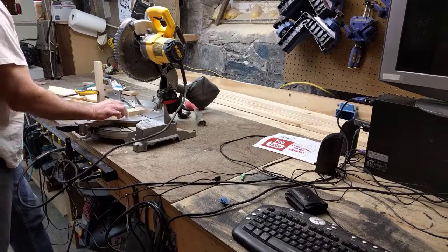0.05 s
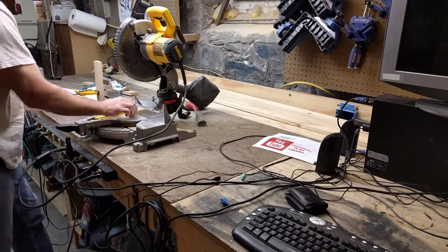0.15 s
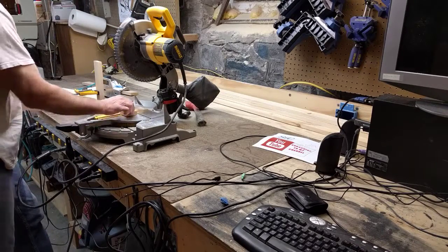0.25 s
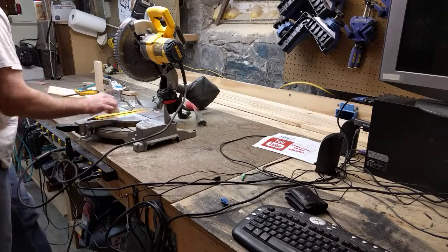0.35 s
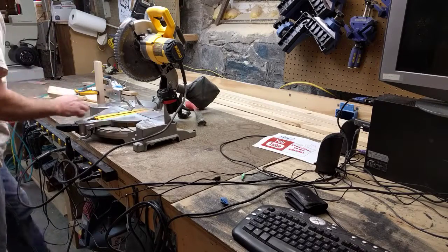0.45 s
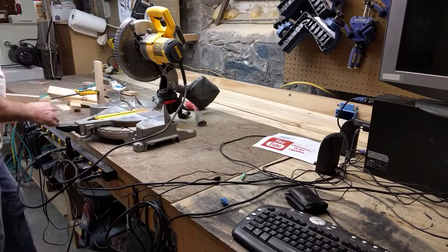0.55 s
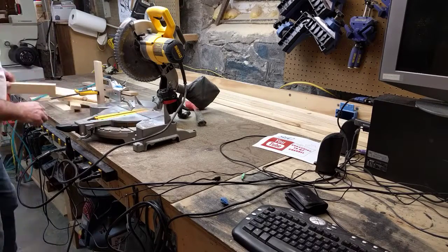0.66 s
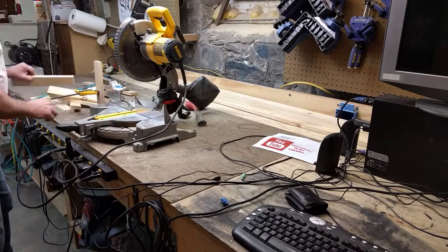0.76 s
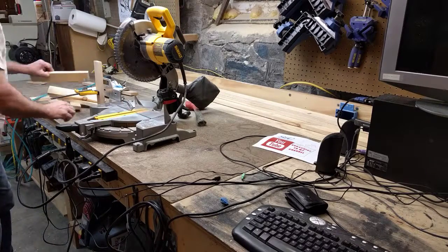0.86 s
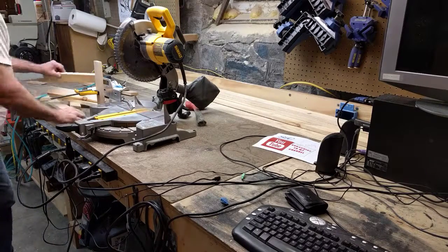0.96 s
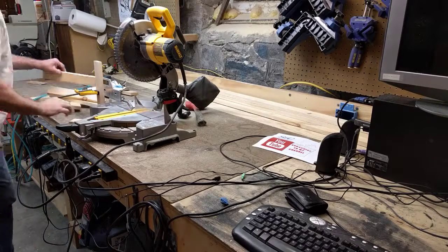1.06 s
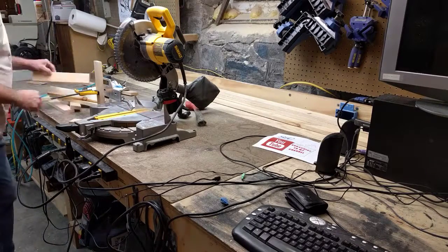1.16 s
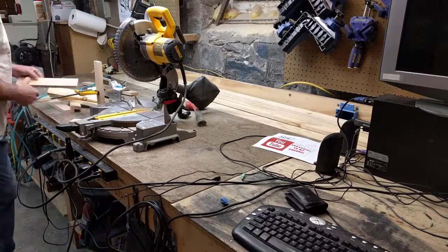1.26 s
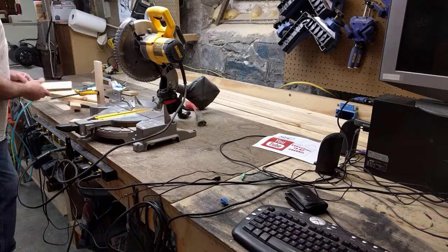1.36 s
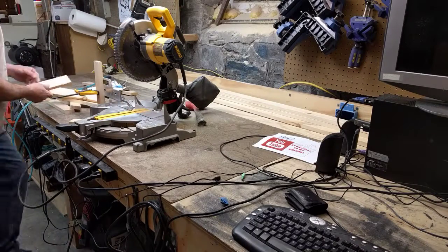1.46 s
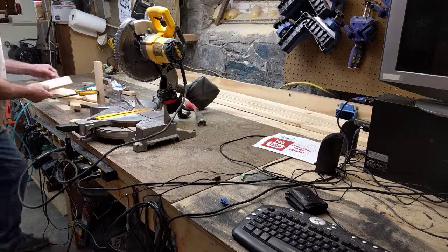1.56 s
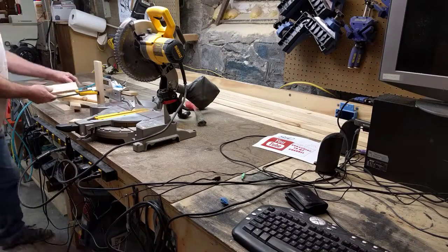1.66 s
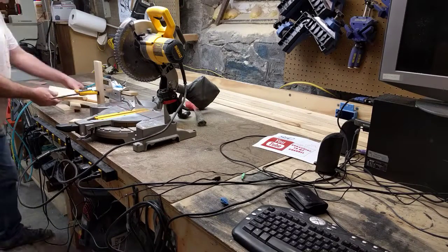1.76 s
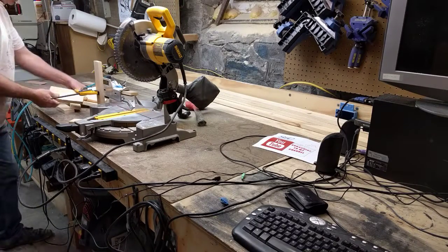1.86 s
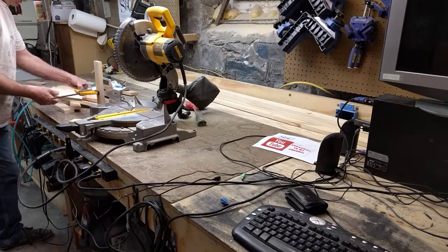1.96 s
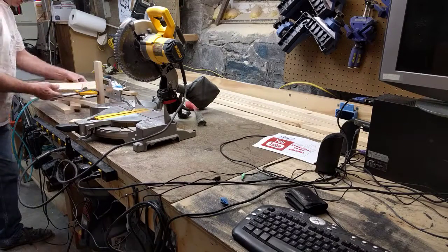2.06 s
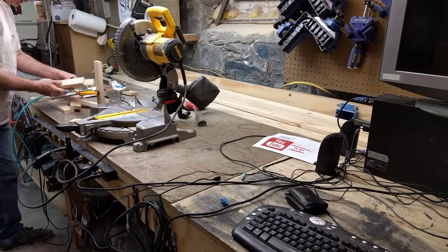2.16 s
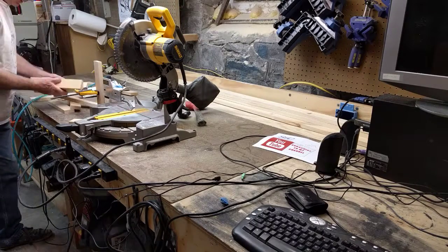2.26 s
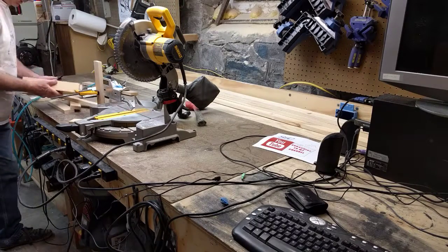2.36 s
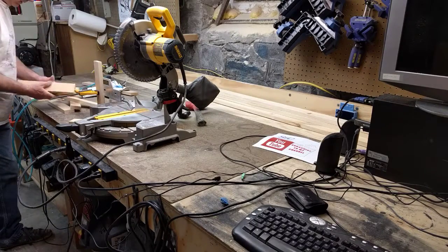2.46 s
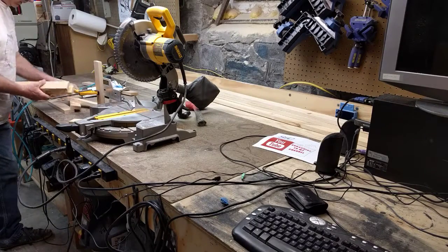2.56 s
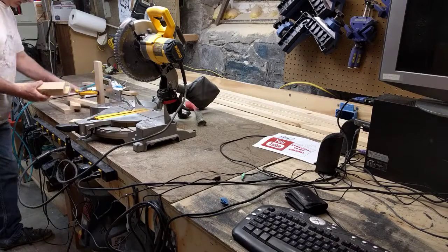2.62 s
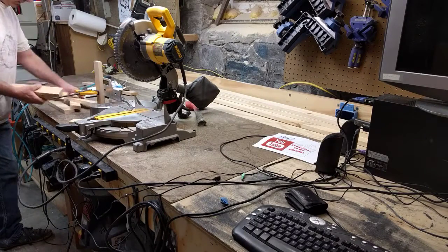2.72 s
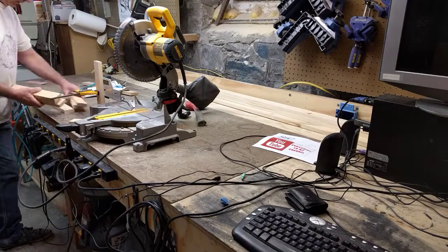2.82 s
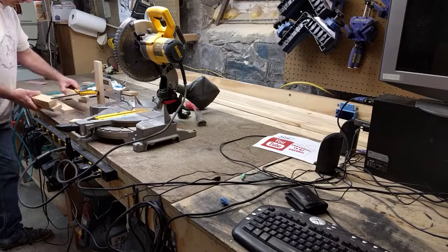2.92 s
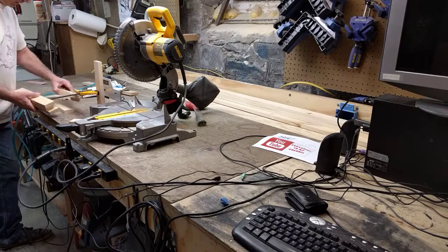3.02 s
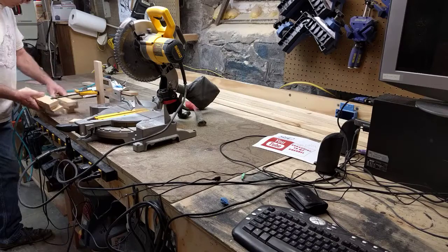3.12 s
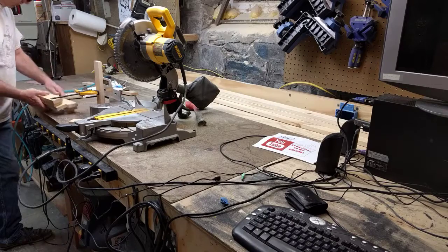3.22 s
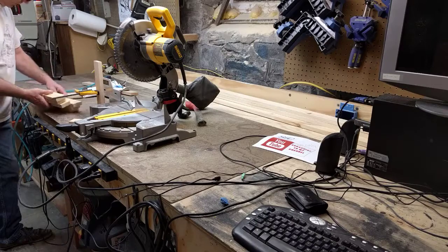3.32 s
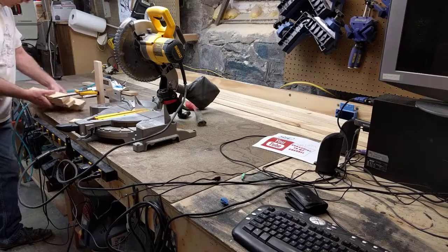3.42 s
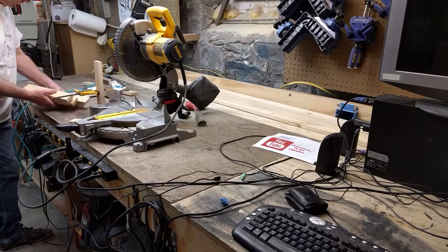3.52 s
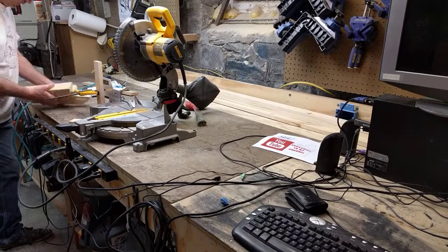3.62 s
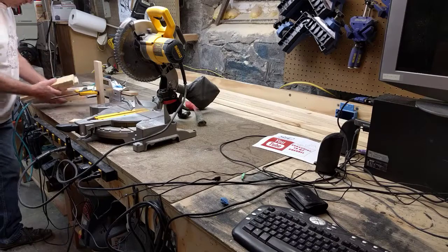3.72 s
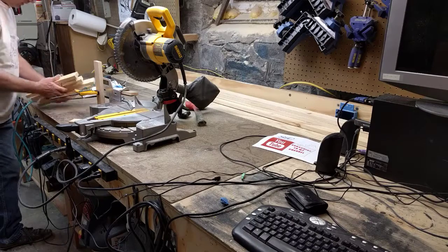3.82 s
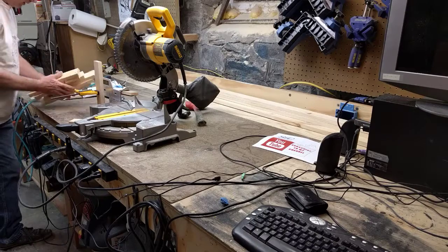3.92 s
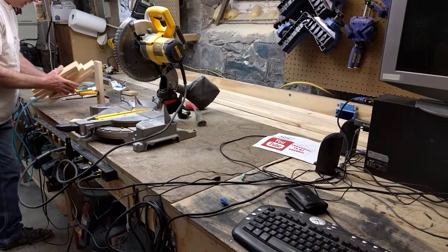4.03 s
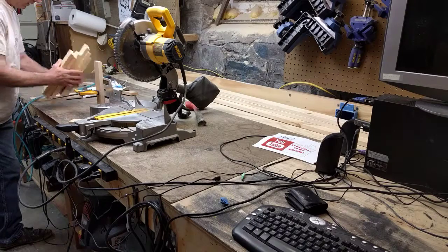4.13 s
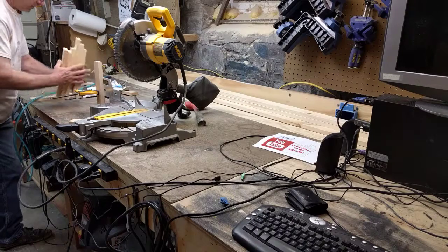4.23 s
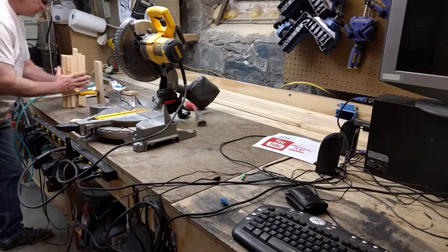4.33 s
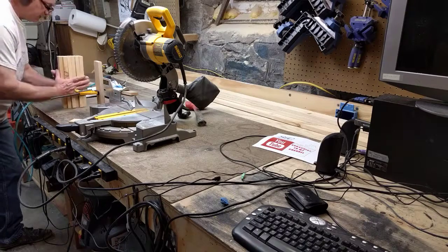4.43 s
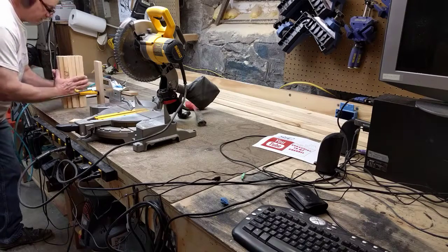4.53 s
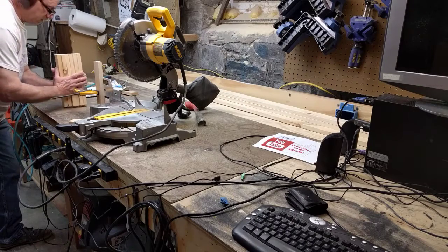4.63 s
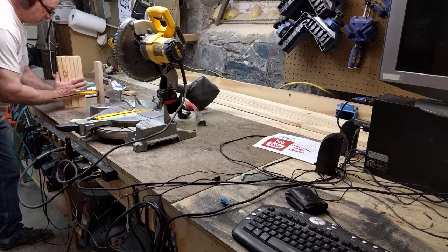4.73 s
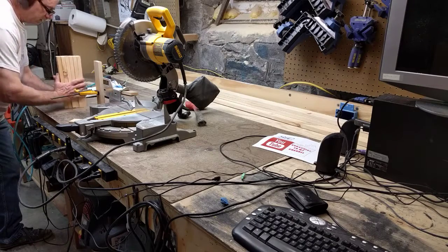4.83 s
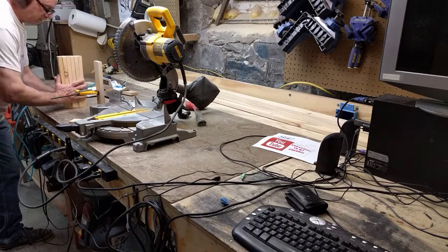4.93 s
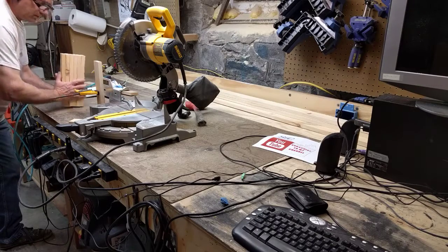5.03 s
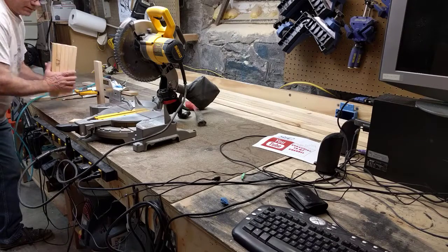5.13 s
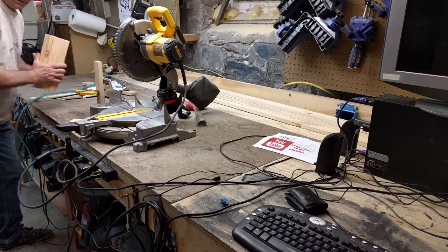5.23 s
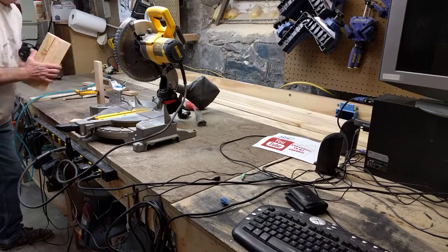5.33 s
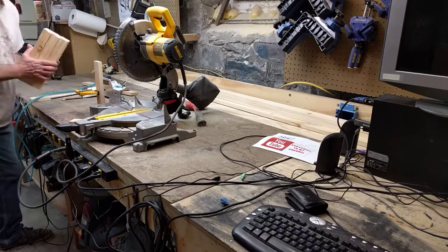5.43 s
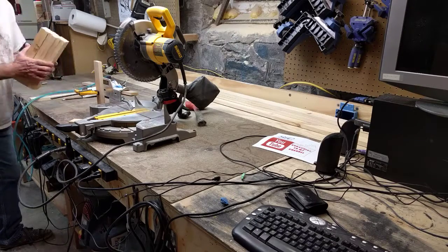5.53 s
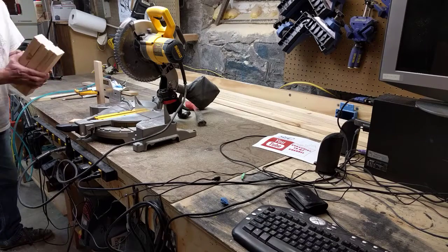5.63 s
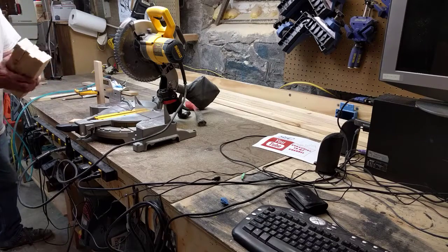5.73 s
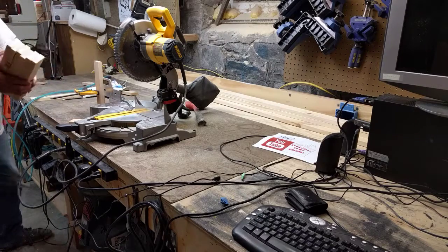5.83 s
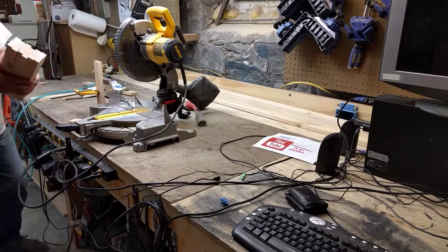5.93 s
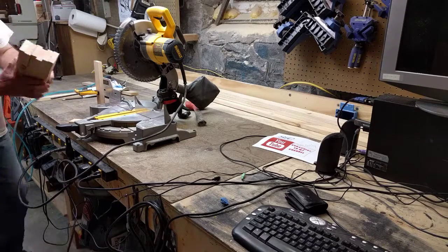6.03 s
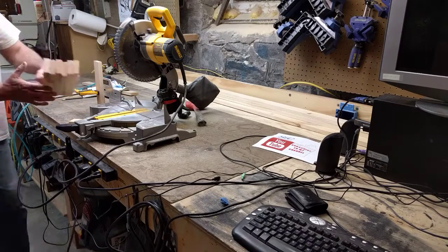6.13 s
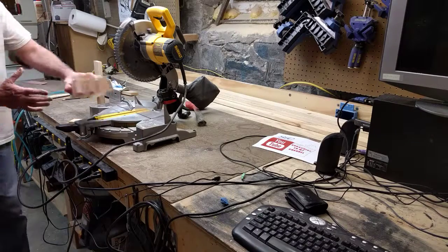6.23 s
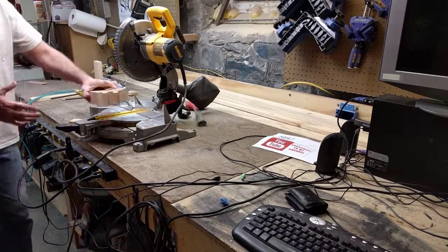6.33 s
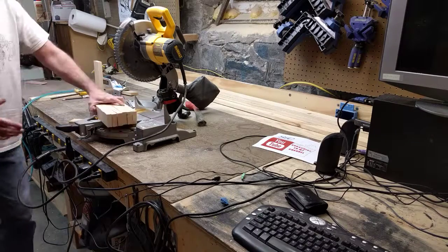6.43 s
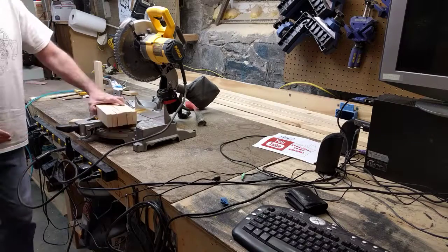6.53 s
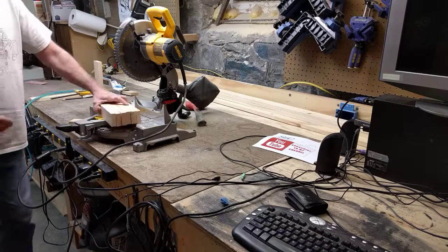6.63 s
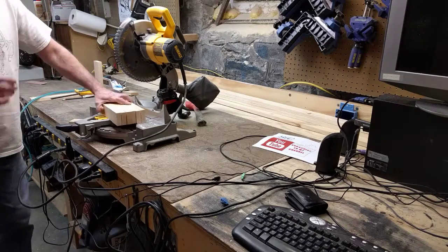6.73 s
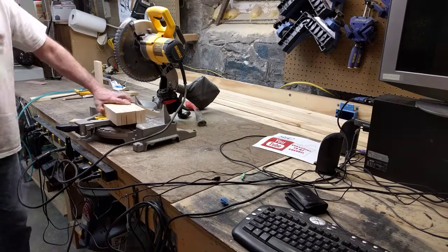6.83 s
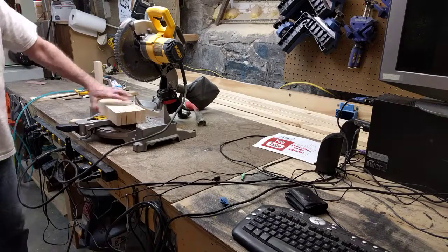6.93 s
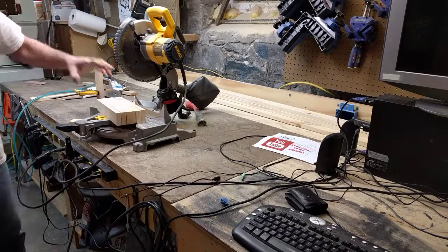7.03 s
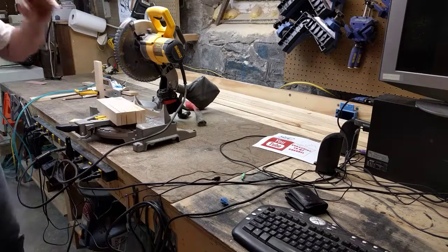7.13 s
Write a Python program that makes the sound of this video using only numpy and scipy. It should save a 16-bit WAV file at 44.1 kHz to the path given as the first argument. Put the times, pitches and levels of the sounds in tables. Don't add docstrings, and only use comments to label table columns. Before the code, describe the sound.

Hands gather wooden blocks with light clacks and rubbing hisses, knock them dully on a workbench, then bang the stack down on cast metal.

```python
import sys
import numpy as np
from scipy import signal
from scipy.fft import rfft, irfft
from scipy.io import wavfile
from scipy.ndimage import uniform_filter1d

SR = 44100
rng = np.random.default_rng(int(sys.argv[2]) if len(sys.argv) > 2 else 0)


def bounce(signal):
    frames = np.transpose(np.atleast_2d(signal))
    limited = np.clip(frames, -1, 1)
    pcm = np.round(limited * 32767).astype(np.int16)
    wavfile.write(sys.argv[1], SR, pcm)


def level_to_linear(level):
    exponent = np.asarray(level, float) / 20
    return 10 ** exponent


N = 316329

# pitch_hz, width_hz, level_db (over the broad colour)
LOOSE_MODES = [(779, 34, 4.3), (1210, 590, 0.51), (1740, 240, 5.4), (2500, 120, 5.2), (4500, 1400, 2.6)]


def rms_one(x):
    return x / np.sqrt(np.mean(x ** 2) + 1e-30)


def at_hz(points, hz):
    table_hz, values = np.array(points).T
    return np.interp(np.log(hz), np.log(table_hz), values)


def band(x, low_hz, high_hz):
    return signal.sosfilt(signal.butter(2, [low_hz, high_hz], "band", fs=SR, output="sos"), x)


def resonate(x, hz, width_hz):
    r, w = np.exp(-np.pi * width_hz / SR), 2 * np.pi * hz / SR
    return signal.lfilter([0, np.sin(w)], [1, -2 * r * np.cos(w), r * r], x + 1e-18)


def coloured(x, spectrum):
    low, high = spectrum[0][0], min(spectrum[-1][0], 17000)
    edges = np.geomspace(low, high, int(3 * np.log2(high / low)))
    out = 0
    for k, (a, b) in enumerate(zip(edges, edges[1:])):
        sign = (-1) ** k
        out = out + sign * level_to_linear(at_hz(spectrum, np.sqrt(a * b))) * band(x, a, b)
    return out


def grains(size, per_s, spread_db):
    strength = level_to_linear(spread_db * np.minimum(rng.exponential(1, size), 5))
    strength *= rng.choice([-1, 1], size)
    return strength * (rng.random(size) < per_s / SR)


def body_response(modes, colour, size):
    whole = coloured(signal.unit_impulse(size), colour)
    for hz, width_hz, db in modes:
        r, w = np.exp(-np.pi * width_hz / SR), 2 * np.pi * hz / SR
        peak = (1 - r * r) / 2 * np.array([1, 0, -1])
        mode = signal.lfilter(peak, [1, -2 * r * np.cos(w), r * r], whole)
        whole = whole + (level_to_linear(db) - 1) * mode
    ranges_hz = (600, 1400), (120, 600), (1400, 3200), (3200, 16500)
    return [band(whole, low, high) for low, high in ranges_hz]


def rebounds(x, lags, share):
    for lag in np.maximum(lags.astype(int), 1):
        loop = np.zeros(lag + 1)
        loop[0], loop[-1] = 1, -share
        x = signal.lfilter(loop[::-1], loop, x)
    return x


def knocks(events, modes, colour, chatter_ms, clack_db):
    out, size = np.zeros((2, N)), 5000
    near_modes = [(hz, width_hz, 1.096 * db) for hz, width_hz, db in modes]
    far_modes = [(hz, width_hz, 0.78 * db) for hz, width_hz, db in modes]
    near = np.array(body_response(near_modes, colour, size))
    far = np.array(body_response(far_modes, colour, size))
    for s, db, heft_db, hard_db in events:
        levels_db = np.array([db, db + heft_db, db + hard_db + clack_db, db + 2 * hard_db])
        gains = level_to_linear(levels_db - 2.5) / np.abs(near).max(axis=1) * [-1, 1, 1, -1]
        thud = np.array([gains[1] * near[1], gains[1] * far[1]])
        first = np.array([gains @ near, gains @ far]) - thud
        spacing = rng.uniform([.05, .15, .35, .3, .6], [.12, .3, .7, .55, 1.1]) * SR / 1000
        touch = rebounds(first, spacing[:3] * chatter_ms * .6, 0.71)
        scattered = rebounds(touch, spacing[3:] * 5, -0.58)
        blow = 1.344 * (0.5 * first + 0.42 * touch + level_to_linear(1) * scattered + 1.24 * thud)
        at = round(s * SR)
        out[:, at:at + size] += blow[:, :N - at]
    return out


def clean_rings(modes):
    out = np.zeros(N)
    for s, hz, db, t60 in modes:
        at = round(s * SR)
        t = np.arange(min(N - at, round(2 * t60 * SR))) / SR
        out[at:at + len(t)] += level_to_linear(db - 60 * t / t60) * np.sin(2 * np.pi * hz * t)
    return out


def workshop(x, spread):
    # pitch_hz, t60_s
    room_t60 = [(60, 0.54), (250, 0.55), (700, 0.34), (2000, 0.32), (6000, 0.25), (10000, 0.09),
                (16000, 0.055)]
    t = np.arange(SR) / SR
    white = rng.standard_normal((2, SR))
    edges = 40 * 2 ** np.arange(0, 9, .5)
    tail = np.zeros(SR)
    for k, (a, b) in enumerate(zip(edges, edges[1:])):
        tail += band(white[k % 2], a, b) * level_to_linear(-60 * t / at_hz(room_t60, np.sqrt(a * b)))
    lines = rfft(tail * (1 - np.exp(-t / 0.0013)))
    even = irfft(lines / np.sqrt(uniform_filter1d(np.abs(lines) ** 2, size=60)))
    even *= (1 - np.exp(-t / .002)) * (t < .8)
    return x + signal.fftconvolve(spread, level_to_linear(-3) * even / np.linalg.norm(even))[:N]


def fans():
    # pitch_hz, level_db (per Hz)
    air_spectrum = [(25, -31), (40, -0.5), (60, 5), (100, -5), (160, -12), (260, -13.5), (420, -6),
                    (630, -14), (900, -20.5), (1300, -18), (3200, -29), (6400, -24.5), (8300, -31.5),
                    (16500, -32.5)]
    # pitch_hz, width_hz, level_db
    fan_tones = [(113.7, 8.6, -70), (250.6, 8.7, -67), (364, 2.9, -71.5), (421, 8.2, -70), (445, 9.9, -87),
                 (847, 83, -72.5), (926, 21, -84.5)]
    white = rng.standard_normal((2, N + SR))
    air = level_to_linear(-61) * rms_one(coloured(white[0], air_spectrum))
    tones = sum(level_to_linear(db) * rms_one(resonate(white[1], hz, width_hz)) for hz, width_hz, db in fan_tones)
    return (air + tones)[SR:]


def blade():
    # start_s, pitch_hz, level_db, t60_s
    blade_modes = [
        (0, 1809, -71, 5),
        (0, 2008, -70.5, 5),
        (0, 2638, -74, 5),
        (6.49, 1852, -59, 3),
        (6.49, 2143, -63, 3),
        (6.49, 2918, -67, 3),
    ]
    return clean_rings(blade_modes)


def casting():
    # start_s, pitch_hz, level_db, t60_s
    casting_modes = [
        (6.49, 880, -38, 0.7),
        (6.49, 1270, -31, 0.53),
        (6.49, 1700, -39, 0.4),
        (6.49, 2300, -35, 0.47),
        (6.69, 355, -35, 0.33),
        (6.49, 3275, -34.5, .6),
        (6.49, 1166, -30, .3),
        (6.49, 2497, -34.5, .3),
        (6.485, 206, -27.5, .2),
    ]
    return clean_rings(casting_modes)


def thumps():
    # start_s, level_db (peak), pitch_hz
    shakes = [(0.586, -45, 64), (0.69, -54, 60), (1.935, -45, 84), (1.996, -39.5, 92), (2.772, -46, 71.2),
              (2.858, -74, 55.6), (3.176, -41.5, 88.7), (4.396, -32, 79.3), (4.449, -29, 59.2),
              (4.519, -37.5, 54.7), (4.649, -44, 58), (4.776, -35, 76.3), (4.826, -35.5, 59.8),
              (6.49, -24.5, 62.8), (6.556, -32, 57.4), (6.69, -35.5, 54.6), (6.74, -41, 67.4),
              (6.96, -52, 70), (7.06, -53, 62)]
    out, t = np.zeros(N), np.arange(SR // 2) / SR
    swell = (1 - np.exp(-t / 0.015)) * np.exp(-t / 0.053)
    for s, db, hz in shakes:
        lowest = np.sin(2 * np.pi * hz * t)
        upper = np.sin(2 * np.pi * 1.7 * hz * t) + np.sin(2 * np.pi * 2.45 * hz * t)
        at = round(s * SR)
        out[at:at + len(t)] += (level_to_linear(db) * swell * (lowest + 0.42 * upper))[:N - at]
    return out


def table_slam():
    # start_s, level_db, heft_db, hardness_db
    table_events = [
        (6.478, -13, -4.5, -2.5),
        (6.4857, -2.5, -8, 2),
        (6.4925, -7.5, -11, 5.5),
        (6.502, -19.5, -1, 0),
        (6.525, -29, -15, 2),
    ]
    # pitch_hz, width_hz, level_db
    table_modes = [(354, 50, 1.7), (574, 69, 2.7), (830, 73, 7.5), (1210, 130, 5.9), (1680, 350, 10.2),
                   (2273, 140, 7.3), (2514, 50, 7.2), (3770, 150, 2.3), (4640, 150, 7.3), (6360, 390, 6.6),
                   (7140, 150, 3)]
    # pitch_hz, level_db (per Hz)
    table_colour = [(100, -14.5), (300, -5.5), (600, -7), (1200, -0.5), (2000, -3), (3000, -7.5),
                    (4700, -5.5), (6500, -4.5), (8300, -13), (11000, -19), (16000, -26.5)]
    return knocks(table_events, table_modes, table_colour, chatter_ms=3.0, clack_db=-10.5)


def bench_knocks():
    # start_s, level_db, heft_db, hardness_db
    bench_events = [(0.57, -84, 23, 15), (0.586, -78.5, 29, 6), (0.608, -75, 10, 5),
                    (4.3605, -14.5, -10.5, -7.5), (4.366, -15.5, -7, -5), (4.380, -17, 2.5, -6),
                    (4.387, -23, -3, -3), (4.394, -22, 5.5, -3), (4.416, -16, -5, -3), (4.423, -18, 2, -4),
                    (4.4445, -10, -8, -3.5), (4.452, -20.5, -2, -10), (4.465, -29.5, 9, -12),
                    (4.485, -28, 8, -7), (4.505, -27.5, 1.5, -6), (6.195, -46.5, 1.5, -3),
                    (6.691, -50, 0, -1.5), (6.706, -40.5, 7, -2), (6.722, -42, 6, -6), (6.741, -42, 3, -2),
                    (6.756, -40.5, 4.5, -2), (6.772, -41.5, 4, -12), (6.787, -57, -4, -8),
                    (6.832, -41, -20, 1), (6.948, -53.5, 5, 0), (7.022, -50.5, -4.5, 1.5)]
    # start_s, level_db, heft_db, hardness_db
    stand_events = [
        (4.7495, -19.5, -3.5, -5.5),
        (4.757, -16, -2.5, -6),
        (4.764, -14, 1.5, -21.5),
        (4.785, -25, 3, -7),
        (4.803, -28.5, 6.5, -15),
        (4.88, -35.5, 3.5, -3.5),
    ]
    # pitch_hz, width_hz, level_db
    bench_modes = [(204, 6.2, 8.2), (353, 90, 7.1), (452.7, 37, 11.7), (605, 40, 7.1), (747, 110, 6.2),
                   (880, 69, 1), (1010, 89, 1.5)]
    # pitch_hz, width_hz, level_db
    stand_modes = [(310, 46, 2.7), (467, 35, 10.8), (608, 44, 9.9), (790, 37, 14.5), (2230, 190, 4.8)]
    # pitch_hz, level_db (per Hz)
    bench_colour = [(100, -34), (200, -1), (450, -3.5), (800, -5), (1000, -13), (1400, -18.5),
                    (2200, -28.5), (3300, -29.5), (6500, -23), (8300, -34.5), (11000, -45.5),
                    (16000, -59.5)]
    squared = knocks(bench_events, bench_modes, bench_colour, chatter_ms=5.5, clack_db=-4.5)
    return squared + knocks(stand_events, stand_modes, bench_colour, chatter_ms=5.5, clack_db=-4.5)


def squeaks():
    # start_s, end_s, pitch_hz, width_hz, level_db
    sung_edges = [(1.385, 1.44, 2300, 200, -64), (1.904, 1.95, 4860, 250, -67),
                  (1.97, 2.093, 2380, 110, -54), (2.72, 2.85, 4910, 200, -69.5),
                  (2.723, 2.851, 2900, 200, -78), (3.34, 3.58, 5600, 350, -71),
                  (3.624, 3.69, 2700, 200, -74), (4.846, 4.914, 7100, 120, -62.5),
                  (5.222, 5.35, 2200, 151, -74), (5.39, 5.455, 7560, 1100, -52.5),
                  (5.395, 5.45, 12500, 3800, -67), (2.82, 2.93, 5300, 250, -66),
                  (2.84, 2.96, 7400, 400, -66), (2.85, 2.9, 1700, 150, -65), (1.268, 1.31, 1220, 200, -55),
                  (1.32, 1.38, 6850, 400, -59), (7.02, 7.08, 1500, 900, -63), (6.19, 6.27, 570, 90, -55.5),
                  (2.78, 2.9, 310, 80, -61), (6.92, 7.17, 835, 160, -65), (5.568, 5.617, 786, 70.5, -61.5),
                  (5.906, 6.023, 1760, 120, -69.5), (5.88, 5.97, 1070, 92, -70),
                  (6.815, 6.889, 915, 330, -48)]
    out = np.zeros(N)
    for start, end, hz, width_hz, db in sung_edges:
        at, size = round(start * SR), round((end - start) * SR)
        friction = rng.standard_normal(16000)
        sung = resonate(resonate(friction, hz, width_hz), hz, width_hz)[2000:2000 + size]
        phase = np.arange(size) / size
        envelope = np.sqrt(np.minimum(6 * phase, 1) * (1 - phase))
        out[at:at + size] += level_to_linear(db) * rms_one(sung) * envelope
    return out


def slides():
    # start_s, stop_s, level_db (hiss at the stop), swell_db (on the way),
    # ring_db (block ring against hiss)
    drags = [(0.705, 0.75, -51.5, -0.5, -3), (1.034, 1.21, -46.5, 4.5, -0.5), (1.256, 1.345, -50.5, 1.5, 0),
             (1.354, 1.492, -64, -3, -7), (1.561, 1.571, -52, 6, 4.5), (1.679, 1.72, -58, -4, -1),
             (1.856, 1.962, -57, 14, 1), (1.978, 2.131, -43.5, 9, -2.5), (2.28, 2.324, -41, 8, 4.5),
             (2.365, 2.43, -56, 8, 6), (2.501, 2.535, -49, 8, 0), (2.8, 2.856, -56, 18, 3.5),
             (2.877, 2.924, -63, -1, -6), (3.2, 3.313, -52, 12, 5), (3.34, 3.506, -56, -4.5, 1),
             (3.51, 3.62, -65.5, 1, -2), (3.787, 3.866, -55.5, 15, -7), (3.889, 3.971, -56.5, 9.5, -3.5),
             (4.528, 4.62, -55.5, 7, 4), (4.758, 4.833, -51, -9, -8.5), (6.19, 6.225, -47.5, 5.5, 5.5),
             (6.59, 6.661, -53, 1, 16), (6.68, 6.712, -47.5, 12, 8), (6.779, 6.886, -46.5, 8, -2)]
    # start_s, stop_s, level_db (hiss at the stop), swell_db (on the way)
    grips = [(0.252, 0.28, -58.5, 12), (0.544, 0.6, -68, 8), (2.731, 2.785, -64, 3.5),
             (3.651, 3.617, -54, 5), (3.732, 3.777, -68, -2), (4.166, 4.159, -64.5, -2), (4.94, 5, -60, 11),
             (5.062, 5.08, -69.5, -2.5), (5.16, 5.237, -64, 13), (5.253, 5.352, -63.5, 3),
             (5.387, 5.413, -51.5, 16), (5.443, 5.48, -72.5, 8.5), (5.573, 5.603, -54.5, 9.5),
             (5.68, 5.77, -69, 10), (5.842, 5.951, -58, 16), (6.02, 6.07, -67.5, 10),
             (6.382, 6.444, -65, 9.5), (6.437, 6.502, -66, 11), (7.004, 7.092, -64.5, 13)]
    # pitch_hz, level_db (per Hz)
    hiss_spectrum = [(1800, -7), (2800, -6.5), (4000, -7), (5200, 0.5), (6700, -0.5), (7500, 10.5),
                     (8300, -19.5), (11000, -19), (14000, -29), (16000, -26)]
    # pitch_hz, level_db (per Hz)
    rub_spectrum = [(180, -39.5), (300, -1), (539, 2), (706, -24), (779, 33), (887, 8), (1760, 4),
                    (4000, -9.5), (5200, -90), (8800, -120)]
    set_in_db_per_s, let_go_db_per_s, grip_ring_db = 2492.5, 318.5, -4
    t = np.arange(N) / SR
    hiss_gain, rub_gain = np.zeros((2, N))
    for start, stop, db, swell_db, ring_db in drags + [(*row, grip_ring_db) for row in grips]:
        span = slice(round((start - .05) * SR), round((stop + .3) * SR))
        times = [start - .05, start, stop, stop + .3]
        drops_db = [swell_db + .05 * set_in_db_per_s, swell_db, 0, .3 * let_go_db_per_s]
        stroke = level_to_linear(db - np.interp(t[span], times, drops_db))
        hiss_gain[span] += stroke
        rub_gain[span] += level_to_linear(ring_db) * stroke
    hiss = rms_one(coloured(grains(N, 11000, 0.83), hiss_spectrum))
    fibres = grains(N, 2700, 2.2)
    ring = sum(level_to_linear(db) * resonate(fibres, hz, width_hz) for hz, width_hz, db in LOOSE_MODES if hz < 3000)
    rub = rms_one(coloured(fibres, rub_spectrum)) + 0.24 * rms_one(ring)
    return level_to_linear(-2.5) * hiss_gain * hiss + level_to_linear(-6.5) * rub_gain * rub


def free_rings():
    # start_s, pitch_hz, level_db, t60_s
    wood_modes = [(0.575, 365, -48, .15), (0.568, 220, -48, .1), (0.61, 300, -47, 0.088),
                  (3.16, 750, -22.5, 0.087), (0.995, 1550, -33, 0.035), (1.004, 6120, -36, 0.036),
                  (2.252, 2370, -30, 0.06), (2.255, 940, -33.5, .1), (2.463, 1570, -29.5, 0.1),
                  (2.484, 3030, -36, .03), (2.511, 2350, -42, 0.15), (3.165, 3720, -22.5, 0.057),
                  (3.176, 1110, -18.5, 0.08), (3.329, 4900, -38, .05), (3.331, 4480, -33, 0.056),
                  (3.991, 1715, -22, 0.051), (3.993, 4370, -24, 0.038), (3.994, 5530, -39, .025),
                  (3.995, 6250, -31, .025), (4.03, 1727, -29, 0.05), (4.362, 744, -20, 0.09),
                  (4.383, 747, -14.5, 0.078), (4.378, 447, -17, 0.25), (4.422, 880, -20, 0.058),
                  (4.449, 790, -11, .06), (4.447, 1010, -16.5, 0.049), (4.766, 801, -15, 0.07),
                  (4.76, 630, -22, 0.07), (6.479, 152, -28.5, 0.091), (6.486, 1550, -9, 0.023),
                  (1.981, 712, -31, 0.052), (1.982, 1060, -35, .08), (1.982, 1780, -37, 0.05),
                  (2.008, 1060, -42, .08), (1.915, 420, -51, 0.11), (2.272, 2370, -26, 0.063),
                  (2.258, 4460, -29.5, .04), (4.365, 343, -27, .13), (4.447, 480, -18.5, 0.23),
                  (4.452, 322, -21.5, .25), (4.452, 266, -23, 0.27), (4.452, 210, -23.5, 0.22),
                  (4.48, 656, -27, .12), (4.751, 758, -21.5, 0.088), (4.751, 337, -22, 0.16),
                  (4.768, 930, -23, 0.07), (4.772, 288, -22, 0.13), (4.806, 302, -25.5, 0.19),
                  (4.885, 273, -33, .1)]
    twins = [(s, hz * (1 - 0.032), db - 6.5, t60) for s, hz, db, t60 in wood_modes if hz > 1200]
    return clean_rings(wood_modes + twins)


def handful_knocks():
    # start_s, level_db, heft_db, hardness_db
    handful_events = [(3.157, -19.5, -3.5, -4.5), (3.163, -19.5, -6.5, 2), (3.169, -27.5, -3.5, 8),
                      (3.175, -18.5, -0.5, 0.5), (3.183, -26.5, 4, 6), (3.192, -29.5, 6, 9),
                      (3.204, -38, -13, 9.5), (3.23, -44, 14, -4), (3.262, -39.5, 10, 4),
                      (3.28, -40.5, 9, 4), (3.486, -43.5, 4, -14)]
    # pitch_hz, width_hz, level_db
    handful_modes = [(461, 24, 9.5), (768, 113, 16.5), (1110, 19, 8), (1880, 140, 2.3), (3230, 99, 4.7),
                     (3640, 140, 7.6), (5060, 220, 7.4), (6060, 230, 6.8)]
    # pitch_hz, level_db (per Hz)
    handful_colour = [(100, -47), (300, -9), (600, -16.5), (1000, -15.5), (2000, -3), (3300, -5.5),
                      (4700, 0.5), (6500, -1.5), (8300, -21), (11000, -28), (16000, -56)]
    return knocks(handful_events, handful_modes, handful_colour, chatter_ms=5.0, clack_db=2.3)


def loose_knocks():
    # start_s, level_db, heft_db, hardness_db
    nudge_events = [
        (1.18, -38.5, -32, 5.5),
        (1.2, -43.5, -30, 9),
        (1.272, -38.5, -23, -7),
        (1.57, -50, -21, -16),
        (1.666, -52, -1.5, 0),
        (5.599, -61.5, -9, 11.5),
    ]
    lift_events = [
        (0.9935, -20.5, -16.5, 0.5),
        (0.997, -27.5, -22, -3),
        (1.002, -28.5, -3.5, 7.5),
        (1.012, -36, -15, -8),
    ]
    tip_events = [
        (1.979, -28.5, -3.5, -31),
        (1.995, -34.5, 2, -26),
    ]
    tuck_events = [
        (3.329, -22.5, -11, 0),
        (3.334, -23, -30, -2),
        (3.345, -27.5, -24, -3.5),
        (3.362, -28.5, -5, -8),
        (3.375, -35, -5, -1),
    ]
    edge_events = [
        (3.990, -19, -34, -4.5),
        (3.997, -24.5, -21, 4.5),
        (4.006, -27, -19, -7),
        (4.03, -33, -14, 6),
    ]
    # pitch_hz, width_hz, level_db
    lift_modes = [(990, 130, 8.4), (1550, 140, 6.3), (2370, 92, 2.1), (3600, 110, 2), (5200, 92, 2),
                  (6120, 200, 9), (6600, 220, 4.5)]
    tip_modes = [(727, 110, 13), (1020, 130, 6.8), (2320, 100, 4)]
    tuck_modes = [(840, 97, 8.2), (1116, 73, 11.5), (1496, 62, 12.6), (2560, 230, 13.2), (3100, 190, 6),
                  (4480, 136, 13), (4900, 180, 16.2)]
    edge_modes = [(925, 98, 6.3), (2620, 120, 1.8), (1750, 450, 5.5), (2350, 300, 5.1), (4370, 1100, 11.4),
                  (5630, 280, 7.6), (6250, 270, 6.7)]
    # pitch_hz, level_db (per Hz)
    loose_colour = [(100, -26), (300, -18), (600, -16), (1000, -16), (2000, -6), (3300, -4.5), (4700, -1),
                    (6500, 1), (8300, -13), (11000, -22), (16000, -62)]
    handlings = ((nudge_events, LOOSE_MODES), (lift_events, lift_modes), (tip_events, tip_modes),
                 (tuck_events, tuck_modes), (edge_events, edge_modes))
    return sum(knocks(events, modes, loose_colour, chatter_ms=2.6, clack_db=-3.5)
               for events, modes in handlings)


def pair_clacks():
    # start_s, level_db, heft_db, hardness_db
    pair_events = [
        (1.389, -54, -12, 1),
        (2.246, -27.5, -23, 7.5),
        (2.251, -21.5, -28, -2.5),
    ]
    # start_s, level_db, heft_db, hardness_db
    clap_events = [
        (2.459, -24, -35, -4.5),
        (2.466, -26.5, -27, -5),
        (2.474, -33, -9, -11),
        (2.482, -30, -25, -16),
    ]
    # pitch_hz, width_hz, level_db
    pair_modes = [(940, 52, 19.5), (1520, 61, 14), (2370, 120, 13), (3100, 92, -0.5), (4360, 400, 4)]
    # pitch_hz, width_hz, level_db
    clap_modes = [(960, 74, 14), (1570, 75, 16.3), (1713, 64, 8.5), (2350, 220, 22.6), (3030, 280, 3.8),
                  (4220, 450, 9.7)]
    # pitch_hz, level_db (per Hz)
    pair_colour = [(100, -40), (300, -33), (600, -22.5), (1000, -20.5), (2000, -12.5), (3300, -9.5),
                   (4700, -3), (6500, -1), (8300, -20), (11000, -26), (16000, -45.5)]
    first = knocks(pair_events, pair_modes, pair_colour, chatter_ms=1.5, clack_db=6.2)
    return first + knocks(clap_events, clap_modes, pair_colour, chatter_ms=1.5, clack_db=6.2)


def scene():
    hits = table_slam() + bench_knocks() + handful_knocks() + loose_knocks() + pair_clacks()
    near_hands = slides() + squeaks()
    in_room = workshop(*(hits + 0.68 * near_hands))
    rings = blade() + casting() + free_rings()
    return (in_room + near_hands + thumps() + rings + fans())[None]


def band_limit(x):
    return signal.sosfilt(signal.butter(12, 16520, fs=SR, output="sos"), x)


def record(dry):
    heard = signal.sosfilt(signal.butter(3, 47, "high", fs=SR, output="sos"), dry)
    heard = heard + 0.4 * band(heard, 5940, 7620)
    overload_at, knee = 0.68, 12
    heard = heard / (1 + np.abs(heard / overload_at) ** knee) ** (1 / knee)
    heard = signal.sosfilt(signal.cheby2(14, 50, 16650, fs=SR, output="sos"), heard)
    return band_limit(heard)


dry = scene()
out = record(dry)
bounce(out)
```